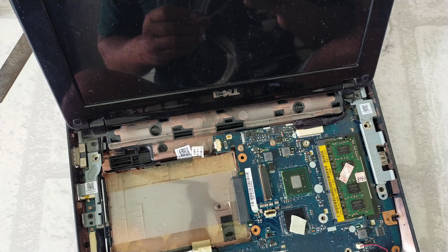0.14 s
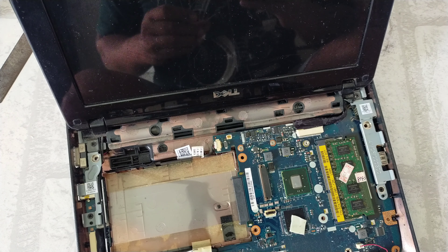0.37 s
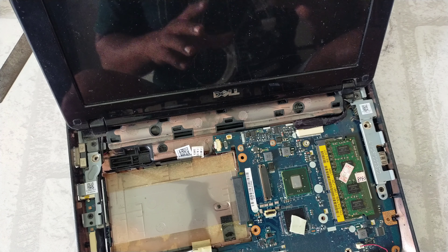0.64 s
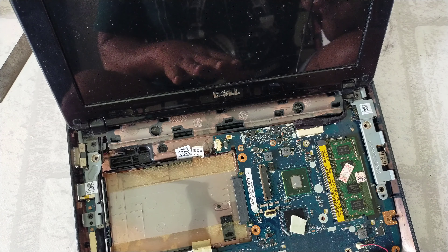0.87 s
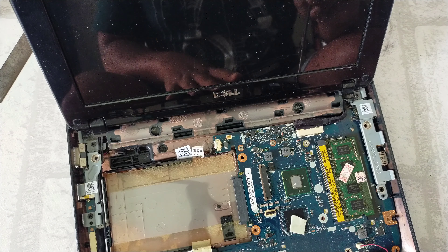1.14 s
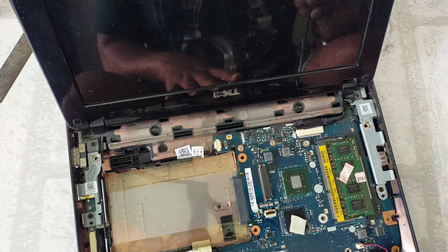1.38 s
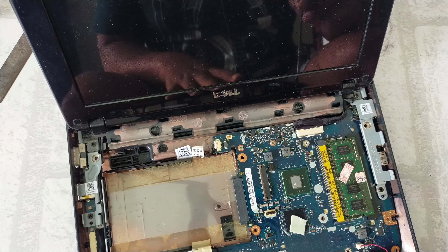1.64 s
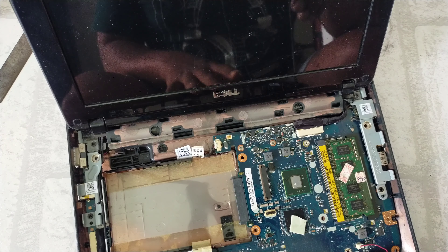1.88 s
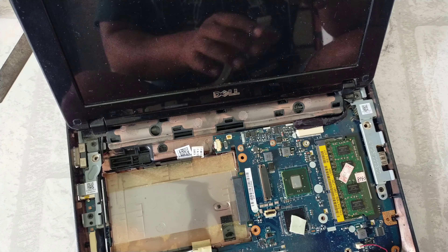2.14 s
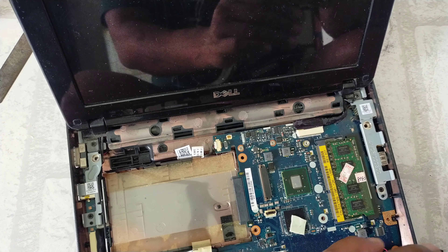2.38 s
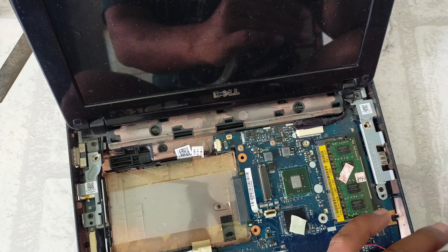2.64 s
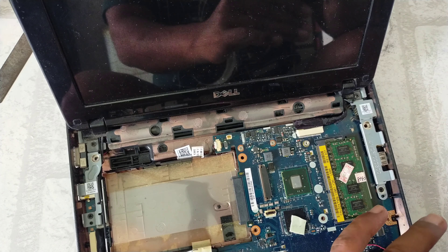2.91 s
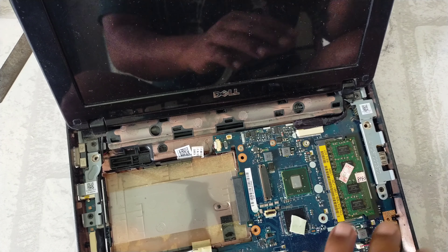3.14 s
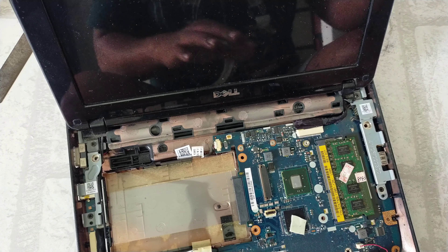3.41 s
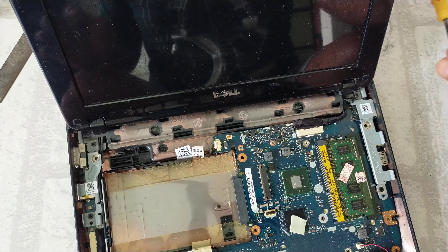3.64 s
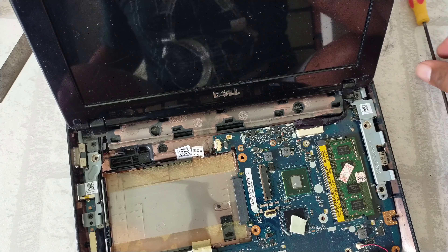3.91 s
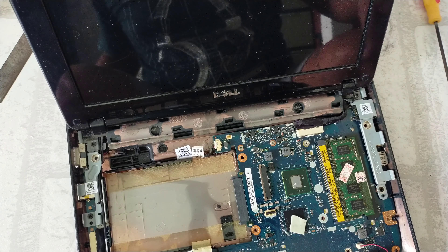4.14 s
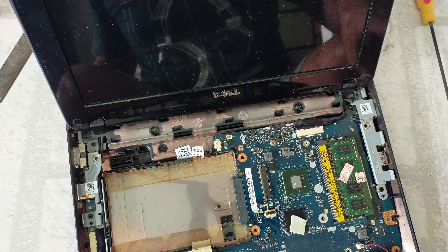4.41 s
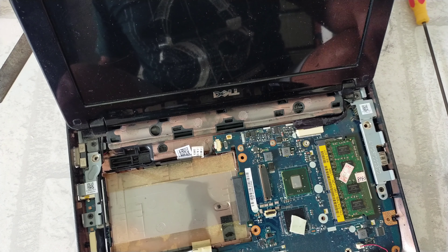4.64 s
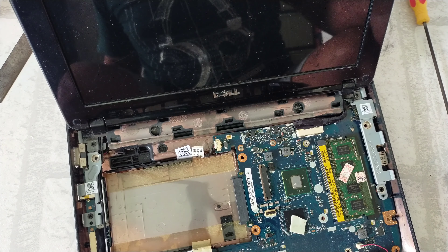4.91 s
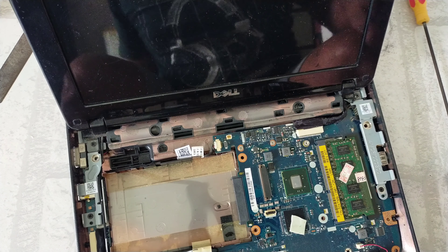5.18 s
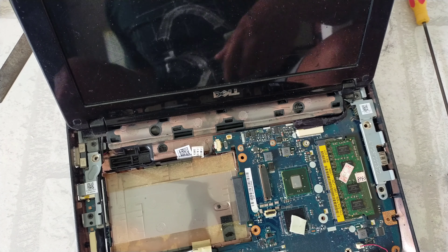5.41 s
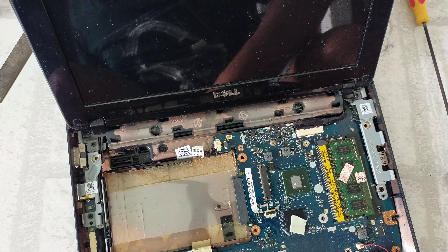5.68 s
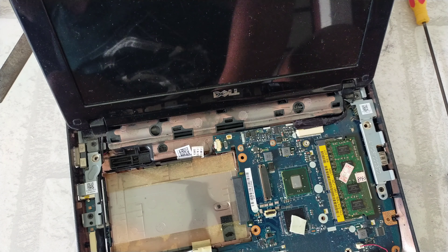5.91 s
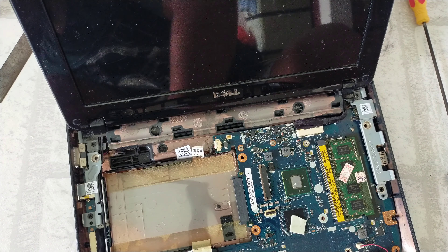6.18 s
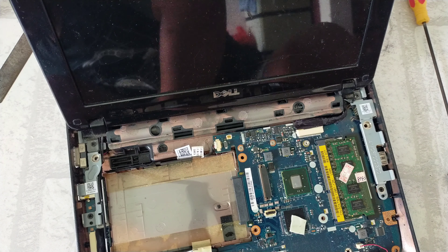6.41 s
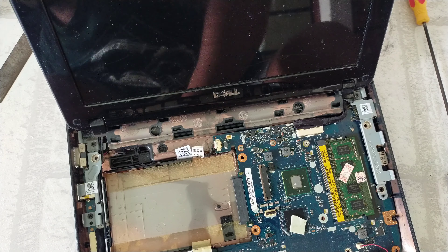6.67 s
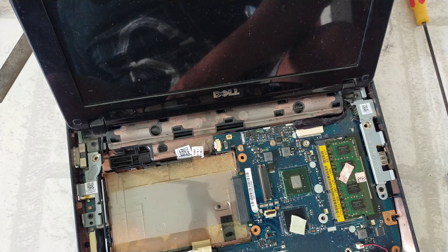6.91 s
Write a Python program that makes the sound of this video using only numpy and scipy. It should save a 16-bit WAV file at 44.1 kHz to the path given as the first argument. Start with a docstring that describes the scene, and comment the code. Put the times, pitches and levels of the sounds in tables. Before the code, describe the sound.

A steady low electrical hum and soft air noise fill a small echoing room. Close up, dull knocks on a desk come first, followed by a few barely audible touches. Then a screwdriver is put down, the loudest moment, clattering and ringing hollowly as it settles. Light ticks and short scuffs trail off, a crisp click sounds, and quiet returns.

```python
"""In a quiet, bare room, a screwdriver and small laptop parts are put down and shifted on a desk.
Each touch is a few ms of rattling noise through resonances: a knock, a bright tick and the handle's ring.
Pushes set desk modes thudding; the tip squeaks, the shaft chatters and fingers shuffle parts along.
Decaying noise in bands echoes it all off the walls, over banded room noise and a mains-driven hum,
a few sines wavering at a motor's turning rate."""
import sys
import numpy as np
from scipy import signal
from scipy.fft import rfft, irfft
from scipy.io import wavfile

SR = 44100
rng = np.random.default_rng(int(sys.argv[2]) if len(sys.argv) > 2 else 0)


def to_wav(sig):
    """Store sig (one row per channel, or 1-D mono) as 16-bit WAV at the path in sys.argv[1].

    Samples outside -1..1 are clipped; the rate is SR.
    """
    pcm = np.clip(np.atleast_2d(sig), -1, 1) * 32767
    pcm = np.round(pcm).astype(np.int16)
    wavfile.write(sys.argv[1], SR, pcm.T)  # frames by channels


def volts_from_db(level):
    """Convert decibel levels to linear amplitude ratios."""
    exponent = np.asarray(level, float) / 20
    return 10 ** exponent


N = 310771


def rms_one(x):
    """Scale to unit power."""
    return x / np.sqrt(np.mean(x ** 2) + 1e-20)


def drift(rate_hz):
    """Slow chance: noise at every 40th sample through a double one-pole low-pass; spread 1."""
    r = np.exp(-80 * np.pi * rate_hz / SR)
    white = rng.standard_normal(N // 40 + 2002)
    slow = signal.lfilter([1], [1, -2 * r, r * r], white)[2000:]   # skip the filter's start
    return np.interp(np.arange(N) / 40, np.arange(len(slow)), rms_one(slow))


def butter(order, edge_hz, kind, x):
    """Butterworth filter: a low-pass, high-pass or band-pass."""
    return signal.sosfilt(signal.butter(order, edge_hz, kind, fs=SR, output="sos"), x)


def favour(table, centre_hz, octaves):
    """Share that each resonance gets from a blow that favours one pitch."""
    distance = np.log2(np.array(table)[:, 0] / centre_hz) / octaves
    return np.exp(-distance ** 2)[:, None]


def ring(forces, modes):
    """A unit click sets each mode ringing at its own height; one force per mode."""
    out = 0
    for force, (pitch_hz, level_db, t60_s) in zip(forces, modes):
        r = volts_from_db(-60 / (t60_s * SR))
        w = 2 * np.pi * pitch_hz / SR
        height = volts_from_db(level_db) * np.sin(w)
        out = out + signal.lfilter([0, height], [1, -2 * r * np.cos(w), r * r], force + 1e-18)
    return out


def resonate(inputs, peaks):
    """Broad resonances side by side, signs alternating; one input each."""
    out = 0
    for k, (x, (pitch_hz, width_hz, level_db)) in enumerate(zip(inputs, peaks)):
        r = np.exp(-np.pi * width_hz / SR)
        w = 2 * np.pi * pitch_hz / SR
        top = (-1) ** k * volts_from_db(level_db) * (1 - r * r) / 2
        out = out + signal.lfilter([top, 0, -top], [1, -2 * r * np.cos(w), r * r], x + 1e-18)
    return out


def banded_noise(white, spectrum, patchy_db):
    """Five bands an octave, each with its own level and flicker; unit power."""
    out = 0
    edges_hz = 16 * 2 ** (np.arange(47) / 5)
    pitch_hz, density_db = np.transpose(spectrum)
    for k, (low, high) in enumerate(zip(edges_hz, edges_hz[1:])):
        band = butter(2, [low, high], "band", white[k % 2])   # neighbours use different noise
        level_db = np.interp(np.log(low * high) / 2, np.log(pitch_hz), density_db)
        out = out + volts_from_db(level_db + patchy_db * drift(4.4)) * band
    return rms_one(out)


# colour of the room noise: pitch_hz [Hz], density_db [dB per Hz, relative]
AIR_COLOUR = [(15, -20), (28, -13.5), (42, -6), (65, -7), (110, -9.5), (150, -13), (180, -8.5), (270, -17),
              (325, -22.5), (385, -15.5), (440, -21), (520, -16), (640, -20), (1000, -19), (1900, -22.5),
              (2500, -30), (3400, -37.5), (4900, -32), (6200, -40.5), (7400, -39), (8400, -36.5),
              (10900, -81)]


def room_air():
    """Soft steady noise of the room, each band flickering slightly."""
    level_db = -54   # rms
    return volts_from_db(level_db) * banded_noise(rng.standard_normal((2, N)), AIR_COLOUR, patchy_db=0.63)


# multiples of the mains buzz: pitch_hz [Hz], level_db [dB rms, before throb and swell]
HUM_TONES = [(100, -70.5), (200, -58), (600, -85)]


def hum():
    """Multiples of the mains buzz, throbbing once per turn of the motor and swelling slowly."""
    turn_hz, waver = 24.55, 0.34   # waver: share of the amplitude
    t = np.arange(N) / SR
    throb = 1 + waver * np.sin(2 * np.pi * turn_hz * t + 1.5 * drift(0.96))
    swell_db = 1.6 * drift(2.0)
    wander = 0.4 * drift(0.7)   # phase, radians
    tones = sum(volts_from_db(level_db + swell_db) * np.sin(2 * np.pi * pitch_hz * t + wander)
                for pitch_hz, level_db in HUM_TONES)
    return np.sqrt(2) * throb * tones


# echo bands of the room: low_hz [Hz], high_hz [Hz], level_db [dB, relative], t60_s [s]
ROOM_BANDS = [(76.6, 380, -6, 0.54), (360, 670, -1.5, 0.43), (990, 2700, -9, 0.7), (3200, 6800, -7.5, 0.65)]


def room(x):
    """Echoes too dense to count: noise that sets in after the first wall and dies away band by band."""
    first_echo_s = 0.0011
    t = np.arange(SR) / SR
    onset = 1 - np.exp(-(t / first_echo_s) ** 2)
    echoes = 0
    for low_hz, high_hz, level_db, t60_s in ROOM_BANDS:
        band = butter(2, [low_hz, high_hz], "band", rng.standard_normal(SR))
        echoes = echoes + volts_from_db(level_db - 60 * t / t60_s) * band * onset
    return signal.fftconvolve(x, echoes / np.sqrt(SR / 20))[:N]


# fingers and parts dragged over the desk:
# start_s [s], fullest_s [s], end_s [s], level_db [dB, before the layer's level]
STROKES = [(4.324, 4.37, 5.5, -65), (4.454, 4.677, 4.772, -55.5), (5.755, 5.793, 5.93, -60.5)]
# colour of the drag: pitch_hz [Hz], density_db [dB per Hz, relative]
STROKE_COLOUR = [(71, -37), (120, -2.5), (205, -4), (325, -9), (497, -6), (1610, -10), (3840, -23.5),
                 (7420, -22), (8400, -47), (10900, -66), (18500, -120)]


def shuffle(per_s, spread_db):
    """Dense tiny catches of skin and plastic on the desk."""
    caught = rng.random((2, N)) < per_s / SR
    sizes_db = spread_db * np.minimum(rng.exponential(1, (2, N)), 4)
    catches = caught * volts_from_db(sizes_db) * rng.choice([-1, 1], (2, N))
    t = np.arange(N) / SR
    strokes = 0
    for *times_s, level_db in STROKES:
        phase = np.interp(t, times_s, [0, np.pi / 2, np.pi])
        strokes = strokes + volts_from_db(level_db) * np.sin(phase) ** 2
    return strokes * banded_noise(catches, STROKE_COLOUR, patchy_db=2.5)


def squeak(width_hz, half_db):
    """Steel tip slides, its stick-slip too uneven for a clean tone: narrow noise on a pitch and its half."""
    loudest_s, level_db = 3.685, -52
    rise_db_per_s, fall_db_per_s = 348, 111
    final_hz, flat_hz, settle_s = 5740, 121.5, 0.026   # flat_hz: shortfall at the loudest moment
    t = np.arange(N) / SR - loudest_s
    gain = volts_from_db(level_db + np.minimum(rise_db_per_s * t, -fall_db_per_s * t))
    pitch_hz = final_hz - flat_hz * np.exp(-np.maximum(t / settle_s, -2))   # settles upward
    turns = 2j * np.pi * np.cumsum(pitch_hz) / SR
    white = rng.standard_normal((2, N)) + 1j * rng.standard_normal((2, N))
    upper, lower = butter(2, width_hz, "low", white)
    pair = upper * np.exp(turns) + volts_from_db(half_db) * lower * np.exp(turns / 2)
    return gain * rms_one(np.real(pair))


# knock colour of a contact, shared with touches(): pitch_hz [Hz], width_hz [Hz], level_db [dB, relative]
KNOCK_PEAKS = [(567, 160, 3), (945, 130, 8), (1500, 516, 5), (2100, 407, 4), (2624, 1290, 1.5),
               (3600, 1300, -1.5)]


def chatter(spread_db):
    """After landing the shaft chatters, dying away: dense uneven bounces into the knock resonances."""
    start_s, level_db, t60_s = 3.782, -35, 0.53   # level: rms at the start
    per_s, centre_hz = 1300, 2100
    t = np.arange(N) / SR - start_s
    sizes_db = spread_db * np.minimum(rng.exponential(1, N), 4)
    sizes = volts_from_db(sizes_db) * rng.choice([-1, 1], N)
    bounces = (rng.random(N) < per_s / SR) * sizes
    grain = rms_one(resonate(bounces * favour(KNOCK_PEAKS, centre_hz, 0.33), KNOCK_PEAKS))
    return grain * (t > 0) * volts_from_db(level_db - 60 * np.maximum(t, 0) / t60_s)


# what the desk top rings with: pitch_hz [Hz], level_db [dB, relative], t60_s [s]
DESK_MODES = [(135, -5.5, 0.23), (175, 1, 0.087), (190, -5, 0.059), (224.3, -4, 0.1), (282, -3, 0.057),
              (351, 0, 0.075), (363, -4.5, 0.095), (560, -21.5, .05)]
# pushes into the desk top: start_s [s], level_db [dB, before the layer's level],
# centre_hz [Hz, pitch that the struck spot favours]
PUSHES = [(1.477, -26.5, 185), (1.52, -43, 203), (1.548, -44, 203), (1.598, -42, 198), (1.64, -18.5, 175),
          (1.672, -18.5, 173), (1.706, -37, 200), (1.915, -42, 159), (1.995, -42.5, 200), (2.085, -42, 176),
          (3.714, -32.5, 187), (3.768, -19, 257), (3.89, -27.5, 237), (3.93, -35, 207), (3.997, -25.5, 247),
          (4.033, -31.5, 233.5), (4.154, -35.5, 276), (4.358, -34.5, 158), (4.449, -29.5, 242),
          (4.487, -38.5, 175), (4.525, -43, 169), (4.56, -35.5, 190), (4.972, -39, 178)]


def thuds(push_ms, thud_db, low_cut_hz):
    """One soft push a blow; a small panel radiates nothing below its lowest modes."""
    push = np.zeros((len(DESK_MODES), N + SR))
    shove = np.hanning(int(push_ms * SR / 1000))
    shove = shove / shove.sum()
    for start_s, level_db, centre_hz in PUSHES:
        at = round(start_s * SR)
        share = favour(DESK_MODES, centre_hz, 0.38)
        push[:, at:at + len(shove)] += volts_from_db(level_db + thud_db) * share * shove
    return butter(4, low_cut_hz, "high", ring(push, DESK_MODES))[:N]


# parts and tool touch the desk: start_s [s], knock_db [dB, before the layer's level],
# centre_hz [Hz, pitch the knock favours], tick_db [dB, before the layer's level],
# contact_ms [ms, time scale of the rattle]
TOUCHES_ON_DESK = [(1.474, -32, 1400, -53.5, 6.8), (1.640, -20.5, 2640, -33, 5.9),
                   (1.643, -26.5, 910, -58, 7.5), (1.667, -41, 2500, -36, 8.4),
                   (1.671, -28, 1720, -36.5, 4.7), (1.692, -48, 1790, -55, 4.4),
                   (2.218, -46.5, 2200, -65, 8.9), (2.765, -48.5, 2900, -60, 5),
                   (3.066, -48.5, 3200, -56, 13), (3.715, -24, 1970, -33, 3.1),
                   (3.770, -14.5, 1500, -36, 2.1), (3.773, -13.5, 1740, -48, 2.98),
                   (3.796, -30, 1800, -56, 6.8), (3.89, -31, 1410, -75.5, 4.5),
                   (3.934, -40.5, 2010, -49, 3), (4.001, -31, 1260, -59, 9), (4.009, -42, 2100, -60.5, 8.5),
                   (4.156, -39, 1110, -62, 2.9), (4.329, -41, 3000, -51, 6.9), (4.420, -43, 1990, -61, 32),
                   (4.436, -32, 2050, -41, 5.8), (4.457, -32, 1460, -66, 4.6), (4.577, -50, 1500, -52, 3.4),
                   (4.66, -47, 1650, -51, 5.5), (4.70, -44.5, 970, -49, 5.2),
                   (4.958, -32, 1360, -46.5, 1.9), (4.962, -28, 2680, -29, 6.5),
                   (4.965, -32.5, 1360, -41.5, 9.6), (4.988, -37, 1720, -43, 9.4),
                   (5.322, -69, 2490, -60, 8)]
# the handle rocks and taps with its hollow end: start_s [s], ring_db [dB, before the layer's level]
HANDLE_ROCKS = [(3.72, -27.5), (3.893, -32), (3.939, -36.5), (3.986, -36), (4.208, -48), (4.334, -41),
                (4.459, -28.5), (4.609, -46)]
# touches between these ring the handle more: from_s [s], to_s [s]
TOOL_MOVED = (3.6, 4.8)


def contacts():
    """Touches and rocks alike as start_s, knock_db, centre_hz, tick_db, ring_db, contact_ms."""
    tool_ring_db, part_ring_db = -4.5, -13.5   # against the knock; a part set down barely stirs the handle
    rock_hz, rock_ms = 880, 6.1
    rock_knock_db, rock_tick_db = -6, -34   # against the ring
    first_s, last_s = TOOL_MOVED
    rows = []
    for start_s, knock_db, centre_hz, tick_db, contact_ms in TOUCHES_ON_DESK:
        against_db = tool_ring_db if first_s < start_s < last_s else part_ring_db
        rows.append((start_s, knock_db, centre_hz, tick_db, knock_db + against_db, contact_ms))
    for start_s, ring_db in HANDLE_ROCKS:
        rows.append((start_s, ring_db + rock_knock_db, rock_hz, ring_db + rock_tick_db, ring_db, rock_ms))
    return rows


def rattle(noise, contact_ms):
    """Many bounces in one contact: noise that rises quickly, dies away and has an evened-out spectrum."""
    u = np.arange(len(noise)) / SR / (max(contact_ms, 0.5) / 1000)
    shape = u ** 0.5 * np.exp(-2.0 * u ** 0.85)
    spectrum = rfft(noise * shape)
    even = irfft(spectrum / np.abs(spectrum) ** 0.85) * shape ** 0.25
    return even / np.sqrt(np.sum(even ** 2) / (contact_ms * SR / 1000))


# what the tool's handle rings with: pitch_hz [Hz], level_db [dB, relative], t60_s [s]
HANDLE_MODES = [(562, -8, 0.057), (892, 1, 0.048), (1180, -17.5, 0.048), (1504, 0.5, 0.039),
                (1680, -10, 0.035), (2140, 2, 0.028), (2400, -8, 0.02), (2670, 1.5, 0.027)]
# bright colour of a contact: pitch_hz [Hz], width_hz [Hz], level_db [dB, relative]
TICK_PEAKS = [(3420, 550, -1.5), (4330, 1200, 6.5), (5870, 1500, 8.5), (6300, 930, 2.5), (7570, 2260, 12)]


def touches(knock_db, tick_db, ring_db, knock_cut_hz):
    """Each touch rattles for a few ms: a knock, a bright tick and the ring of the handle."""
    knock = np.zeros((len(KNOCK_PEAKS), N + SR))
    strike = np.zeros((len(HANDLE_MODES), N + SR))
    tick = np.zeros(N + SR)
    for start_s, knock_row, centre_hz, tick_row, ring_row, contact_ms in contacts():
        bounces = rattle(rng.standard_normal(2048), contact_ms)
        at = round(start_s * SR)
        end = at + len(bounces)
        knock[:, at:end] += volts_from_db(knock_row + knock_db) * bounces * favour(KNOCK_PEAKS, centre_hz, 0.7)
        tick[at:end] += volts_from_db(tick_row + tick_db) * bounces
        hardest = at + np.argmax(np.abs(bounces))   # the hardest bounce sets the handle ringing
        strike[:, hardest:hardest + 1] += volts_from_db(ring_row + ring_db) * favour(HANDLE_MODES, centre_hz, 0.89)
    dull = butter(2, knock_cut_hz, "low", resonate(knock, KNOCK_PEAKS))
    bright = resonate([tick] * len(TICK_PEAKS), TICK_PEAKS)
    hollow = butter(2, 400, "high", ring(strike, HANDLE_MODES))   # too small for bass
    return (dull + bright + hollow)[:N]


def scene():
    """Handling near the microphone, its echo, and the steady background."""
    background = room_air() + hum()
    near = volts_from_db(4.5) * shuffle(per_s=2500, spread_db=1.0)
    near = near + squeak(width_hz=300, half_db=-6)
    near = near + chatter(spread_db=2.0)
    near = near + thuds(push_ms=1.29, thud_db=-2.5, low_cut_hz=148.5)
    near = near + touches(knock_db=4.5, tick_db=-8, ring_db=-1.0, knock_cut_hz=3800)
    return (near + room(near) + background)[None]


def roll_off(x):
    """The treble ends steeply here."""
    return signal.sosfilt(signal.butter(12, 8650, fs=SR, output="sos"), x)


def record(dry):
    """A narrow-band recorder cuts the top steeply."""
    cutoff_hz = 8490   # where the loss reaches 60 dB
    mix = signal.sosfilt(signal.cheby2(16, 60, cutoff_hz, fs=SR, output="sos"), dry)
    return roll_off(mix)


dry = scene()
out = record(dry)
to_wav(out)
```